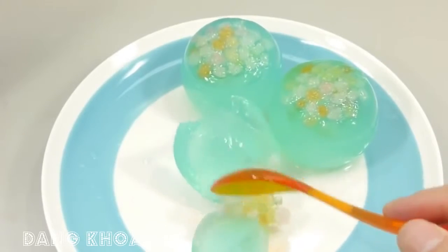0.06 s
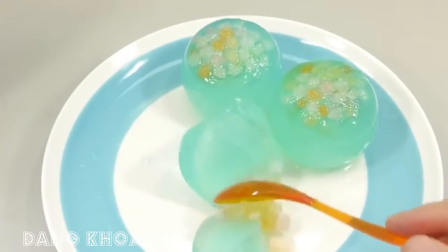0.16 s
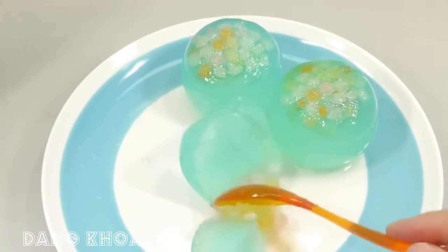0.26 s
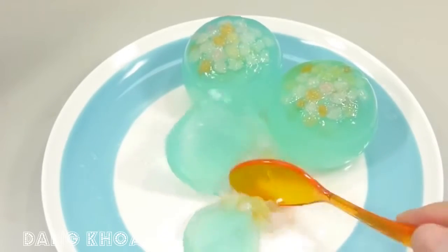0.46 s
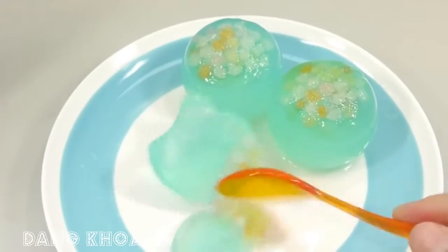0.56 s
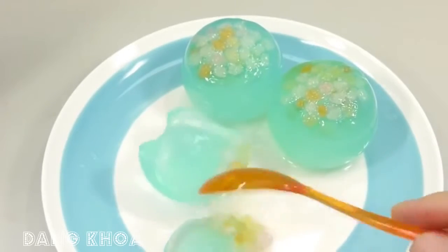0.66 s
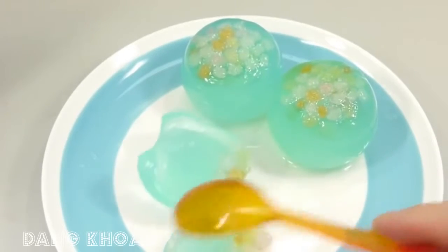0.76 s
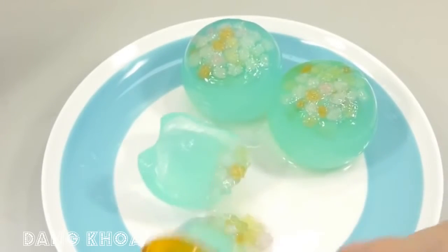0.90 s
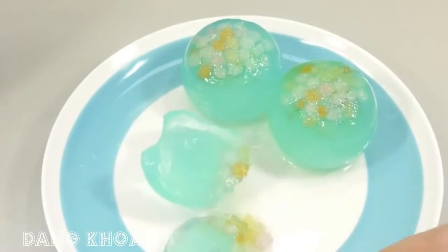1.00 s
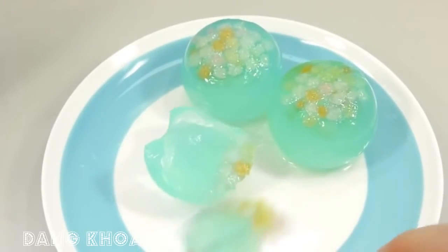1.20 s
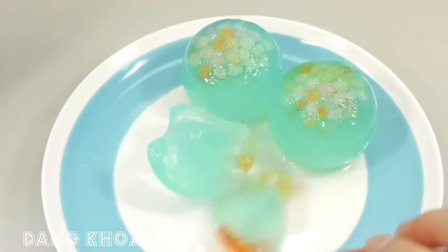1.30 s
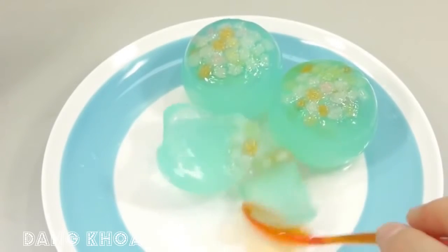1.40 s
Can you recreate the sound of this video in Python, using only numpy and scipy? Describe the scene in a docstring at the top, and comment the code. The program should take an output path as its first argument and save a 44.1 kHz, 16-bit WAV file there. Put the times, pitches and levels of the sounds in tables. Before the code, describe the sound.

Spoon scraping a ceramic plate through wet jelly, with one loud clink and a duller knock.

```python
"""A small, quiet room, the microphone close to a ceramic plate where a plastic spoon cuts jelly.
The jelly crackles wetly; the spoon ticks and scrapes over the glaze, skids into one loud clink and
scrapes again. A duller knock follows, then light sliding. Each contact rings short resonances, and
the plate sings on after the two blows. Behind are a low room rumble and a faint, evenly pulsing tone."""
import sys
import numpy as np
from scipy import signal
from scipy.fft import rfft, irfft
from scipy.io import wavfile

SR = 44100
rng = np.random.default_rng(int(sys.argv[2]) if len(sys.argv) > 2 else 0)


def inscribe(sig):
    """Save sig as 16-bit PCM at rate SR to the path in sys.argv[1].

    A 1-D sig is mono; a 2-D sig holds one channel per row.
    Samples are clipped to [-1, 1] before scaling.
    """
    pcm = np.round(np.clip(np.atleast_2d(sig).T, -1, 1) * 32767)
    wavfile.write(sys.argv[1], SR, pcm.astype(np.int16))


N = 63945
TIME = np.arange(N) / SR
CLINK_AT_S, KNOCK_AT_S = .3348, 1.1559
BASS_HZ, TREBLE_HZ = 2350, 6500


def from_db(db):
    """Decibels to gain."""
    return 10 ** (np.asarray(db) / 20)


def butter(x, hz, kind, order=2):
    """Causal low- or high-pass."""
    return signal.sosfilt(signal.butter(order, hz, kind, fs=SR, output="sos"), x + 1e-18)


def colour(x, points):
    """Give noise a spectrum of (f/Hz, level/dB) points."""
    hz, db = np.transpose(points)
    bins = np.maximum(np.fft.rfftfreq(N, 1 / SR), 1)
    return irfft(rfft(x) * from_db(np.interp(np.log(bins), np.log(hz), db)), N)


def click(at):
    """One unit impulse."""
    return 1.0 * (np.arange(N) == int(at * SR))


def decay(at, decay_s):
    """An envelope that starts at once and dies away."""
    return (TIME >= at) * np.exp(-np.abs(TIME - at) / decay_s)


def slips(per_s=4500, spread_db=3.5):
    """Stick and slip: dense clicks of uneven size."""
    clicks = (rng.random(N) < per_s / SR) * rng.choice([-1, 1], N)
    return clicks * from_db(spread_db * np.minimum(rng.exponential(1, N), 3))


def ring(force, modes):
    """Damped modes (f/Hz, level/dB, t60/s) in parallel, with alternating signs."""
    out = 0
    for k, (hz, db, t60) in enumerate(modes):
        radius = np.exp(-np.log(1000) / (t60 * SR))
        feedback = [1, -2 * radius * np.cos(2 * np.pi * hz / SR), radius ** 2]
        out += (-1) ** k * from_db(db) * signal.lfilter([.5, 0, -.5], feedback, force + 1e-18)
    return out


def shelves(force, bass_db, treble_db):
    """Bass and treble shelves: how soft or sharp a contact is."""
    force = force + (from_db(bass_db) - 1) * butter(force, BASS_HZ, "low", order=1)
    return force + (from_db(treble_db) - 1) * butter(force, TREBLE_HZ, "high", order=1)


def room_rumble(level_db=-52):
    """Room tone: steady noise, mostly bass."""
    # noise floor: f/Hz, level/dB
    spectrum = [(25, -19.5), (45, -8), (70, -0.5), (170, -3.5), (300, -6.5), (600, -7), (1000, -15),
                (2000, -25.5), (4000, -31), (9000, -34.5), (15000, -35)]
    rumble = colour(rng.standard_normal(N), spectrum)
    return from_db(level_db) * rumble / np.std(rumble)


def pulsing_tone(hz=733.6, level_db=-47.5, period_s=.067, width_s=.008, glide_hz_per_s=1200):
    """A faint tone in the background pulses about fifteen times a second, each pulse rising in pitch."""
    out = np.zeros(N)
    for at in np.arange(.010, N / SR, period_s):
        t = TIME - at
        uneven_db, wander_hz = rng.normal(0, [1.4, 20])
        phase = 2 * np.pi * t * (hz + wander_hz + .5 * glide_hz_per_s * t)
        out += from_db(level_db + uneven_db) * np.exp(-.5 * (t / width_s) ** 2) * np.sin(phase)
    return out


def room_echo(x, t60_s=.44, treble_t60_s=.36, delay_s=.0075, build_s=.022):
    """The small room's diffuse echo builds up and dies, the treble first."""
    # colour of the echo: f/Hz, level/dB
    spectrum = [(100, -18.5), (400, -19), (800, -11), (1300, -10.5), (1800, -16), (2300, -14), (3000, -19),
                (3700, -10.5), (4700, -6), (6200, -6), (7500, -9), (11000, -9.5), (15000, -10.5)]
    noise = colour(rng.standard_normal(N), spectrum)
    low = butter(noise, TREBLE_HZ, "low", order=1)
    build = np.clip((TIME - delay_s) / build_s, 0, 1)
    slow, fast = (build * np.exp(-np.log(1000) * TIME / t60) for t60 in (t60_s, treble_t60_s))
    response = (low * slow + (noise - low) * fast) / np.sqrt(np.sum(slow ** 2))
    return signal.fftconvolve(x, response)[:N]


def near_wall(x, delay_s=.0103, level_db=-15):
    """One reflection reaches the microphone just behind the direct sound."""
    return from_db(level_db) * np.interp(TIME - delay_s, TIME, x)


def table_bumps(hz=94, rise_s=.014):
    """Under pressure the plate bumps the table with a soft, low swell."""
    # bumps: t/s, level/dB
    bumps = [(0.261, -46.5), (0.591, -53.5), (1.161, -41.5), (1.201, -50)]
    out = np.zeros(N)
    for at, db in bumps:
        t = np.maximum(TIME - at, 0)
        swell = t / rise_s * np.exp(1 - t / rise_s)
        out += from_db(db) * swell * np.sin(2 * np.pi * hz * t)
    return out


def jelly_crackles():
    """Wet jelly parts from the spoon in short runs of tiny pops."""
    # runs of pops: t/s, level/dB, decay/s
    runs = [(0.1509, -29.5, 0.0038), (0.1696, -41.5, 0.012), (.2035, -37.5, 0.0024),
            (0.2088, -34.5, 0.0034), (0.2236, -30, 0.0043), (.2440, -31, 0.0043), (0.63, -40, .004),
            (0.6728, -36, 0.0057)]
    # colour of the pops: f/Hz, level/dB
    spectrum = [(500, -31), (1500, -12.5), (2800, -4), (5200, 1.5), (8000, -2), (11000, -9), (15000, -14)]
    pops = colour(slips(), spectrum)
    envelope = sum(from_db(db) * decay(at, decay_s) for at, db, decay_s in runs)
    return envelope * pops / np.std(pops)


def light_contact(force, direct_db, detune=.0065, spread_db=1.54):
    """A touch, heard directly and through resonances that vary with the point of contact; no bass."""
    # resonances of spoon on glaze: f/Hz, level/dB, t60/s
    modes = [(1303, -6.5, .055), (2310, -4.5, 0.022), (3495, -10.5, 0.021), (4615, -11, 0.038),
             (5100, -14, 0.024), (5960, -11.5, 0.029), (6205, -12, .022), (7070, -8.5, .009),
             (7630, -14, 0.013), (8380, -9, .03), (8760, -15.5, 0.014), (9820, -9.5, 0.019),
             (10730, -9.5, .018), (12630, -10, 0.013)]
    chance = np.clip(rng.standard_normal((len(modes), 2)), -2, 2)
    varied = [(hz * (1 + detune * shift), db + spread_db * lift, t60)
              for (hz, db, t60), (shift, lift) in zip(modes, chance)]
    return butter(ring(force, varied) + from_db(direct_db) * force, hz=1080, kind="high", order=4)


def spoon_ticks(rasp_db=-16, rasp_s=.0033):
    """Each light touch of the spoon is a click with a brief rasp."""
    # touches: t/s, level/dB, bass/dB, treble/dB
    touches = [(.0950, -41, 3, 3.5), (0.1086, -56, 9, 13.5), (0.2921, -45, -6, -3), (.5602, -33, 1.5, -8.5),
               (0.59, -39.5, 6, -24), (0.5964, -41.5, 9.5, -10), (.6455, -33, 3.5, 1),
               (0.6704, -31.5, -14, 1.5), (1.2615, -45, 8.5, -6), (1.4085, -40, -6, -10)]
    out = np.zeros(N)
    for at, db, bass_db, treble_db in touches:
        rasp = from_db(rasp_db) * rng.standard_normal(N) * decay(at, rasp_s)
        force = shelves(click(at) + rasp, bass_db, treble_db)
        out += from_db(db) * light_contact(force, direct_db=11)
    return out


def spoon_scrapes(attack_s=.0026, release_s=.003):
    """The spoon sticks and slips over the glaze; grit is the bare friction beside the resonances."""
    # strokes: t/s, length/s, level/dB, bass/dB, treble/dB, grit/dB
    strokes = [(0.196, .028, -41, 2, -8, 14), (.226, .027, -36, 2, -1, 8), (0.253, 0.083, -49, 0.5, -5, 17),
               (0.3219, 0.0081, -25, 0, 2, 12), (0.3263, .006, -14, 4, -2, 8.5),
               (.352, 0.09, -46, -6, -4, 10), (0.418, 0.057, -40, -11, 0.5, 11),
               (0.468, 0.083, -53, -0.5, 3, 8), (0.592, 0.014, -38.5, 10, -14, 19),
               (0.608, 0.021, -52.5, 13, -18, 18), (0.6392, 0.016, -34, 2, -3, 9),
               (0.659, .032, -37.5, -20, -2.5, 19), (0.693, 0.032, -46, -4, -8, 2),
               (0.867, 0.0245, -71, 18, -18, 10.5), (1.267, 0.094, -41, -5.5, -8, 3),
               (1.362, 0.02, -45.5, 7, -19, 14), (1.378, 0.055, -44, -11.5, -9, 4),
               (1.437, .020, -41, -17, -18, 12)]
    friction, out = slips(), np.zeros(N)
    for at, length, db, bass_db, treble_db, grit_db in strokes:
        envelope = np.clip((TIME - at) / attack_s, 0, 1) * np.clip((at + length - TIME) / release_s, 0, 1)
        force = shelves(friction * envelope, bass_db, treble_db)
        steady, stroke = light_contact(np.array([friction, force]), direct_db=grit_db)
        out += from_db(db) * stroke / np.std(steady)  # level relative to unbroken rubbing
    return out


def plate_tones():
    """Clear tones of the ceramic outlast the two blows."""
    # lasting modes: f/Hz, t60/s, level at the clink/dB, level at the knock/dB
    modes = [(1238, 0.5, -34.5, -55), (2445, .55, -32.5, -33.5), (4542, .35, -34, -68.5),
             (6000, 0.47, -43.5, -68)]
    out = np.zeros(N)
    for hz, t60, clink_db, knock_db in modes:
        force = from_db(clink_db) * click(CLINK_AT_S) + from_db(knock_db) * click(KNOCK_AT_S)
        out += ring(force, [(hz, 0, t60)])
    return out


def blow(at, modes, crack_db, crack_s, crack_top_hz):
    """An impact gives a crack of noise and rings quickly damped modes."""
    burst = rng.standard_normal(N) * decay(at, crack_s)
    crack = butter(butter(burst, crack_top_hz, "low", order=1), hz=440, kind="high")
    return ring(click(at), modes) + from_db(crack_db) * crack


def knock(gain_db=-17.5):
    """The duller blow: lower modes and a longer, softer crack."""
    # modes of the knock: f/Hz, level/dB, t60/s
    modes = [(221, -17.5, 0.069), (675.4, -1.5, 0.074), (857, -10, 0.061), (1032, -4.5, 0.016),
             (1349, -2, 0.08), (1487, -8, 0.078), (2340, -7.5, 0.018), (2894, -4.5, 0.011),
             (3532, -7.5, 0.047), (4770, -24.5, 0.04), (5050, -15, 0.024), (6000, -18, 0.058),
             (9020, -11, 0.018), (11140, -12.5, 0.014)]
    return from_db(gain_db) * blow(KNOCK_AT_S, modes, crack_db=-2, crack_s=.007, crack_top_hz=2500)


def clink_push(gain_db=11.5):
    """The clink's push on the plate makes a low puff."""
    return from_db(gain_db) * butter(click(CLINK_AT_S), hz=450, kind="low", order=1)


def clink(gain_db=-6.5):
    """The skidding spoon hits the plate hard: a sharp crack and bright modes."""
    # modes of the struck plate: f/Hz, level/dB, t60/s
    modes = [(1218, -5.5, 0.054), (1404, -1, 0.02), (1630, -3.5, 0.014), (2332, -0.5, .03),
             (2760, 0.5, 0.0093), (3169, 0, 0.028), (3943, -11, .03), (4490, -8, 0.05), (4693, -13, .055),
             (4900, -13, 0.034), (5450, -14.5, .02), (5840, -16.5, 0.043), (6400, -17, .03),
             (7300, -14.5, .006)]
    return from_db(gain_db) * blow(CLINK_AT_S, modes, crack_db=5, crack_s=.0017, crack_top_hz=3980)


def scene():
    """In mono: spoon and plate close up, the wall and the room answering, the background behind."""
    background = room_rumble() + pulsing_tone()
    contacts = clink() + knock() + spoon_ticks() + spoon_scrapes() + jelly_crackles()
    reflections = near_wall(contacts) + room_echo(contacts)
    plate = clink_push() + plate_tones() + table_bumps()
    return (background + reflections + plate + contacts)[None]


def record(dry):
    """The loudest peaks are rounded off, the microphone softens the highest treble and the top is cut."""
    ceiling, mic_top_hz, cutoff_hz = .75, 12500, 15700
    rounded = ceiling * np.tanh(dry / ceiling)
    softened = butter(rounded, mic_top_hz, "low")
    return signal.sosfilt(signal.ellip(10, .3, 80, cutoff_hz, fs=SR, output="sos"), softened)


dry = scene()
out = record(dry)
inscribe(out)
```